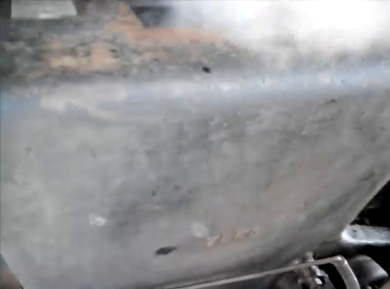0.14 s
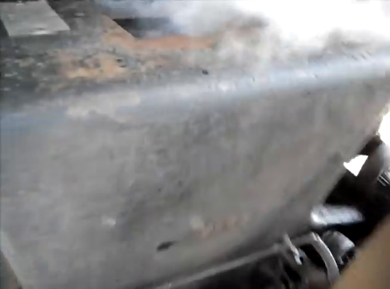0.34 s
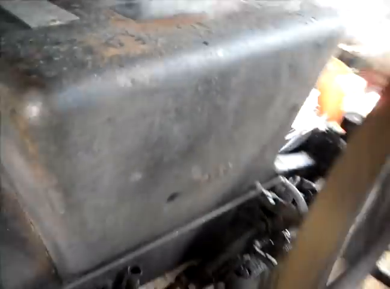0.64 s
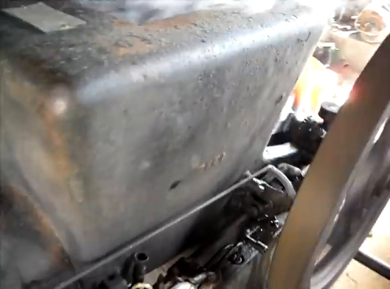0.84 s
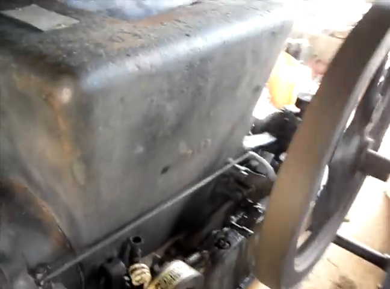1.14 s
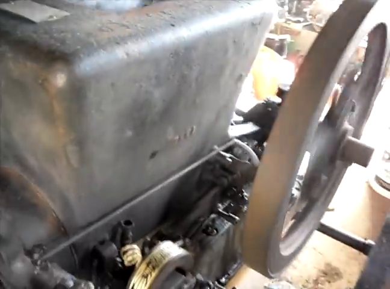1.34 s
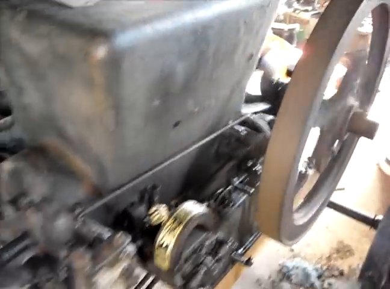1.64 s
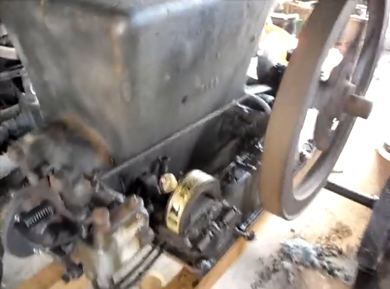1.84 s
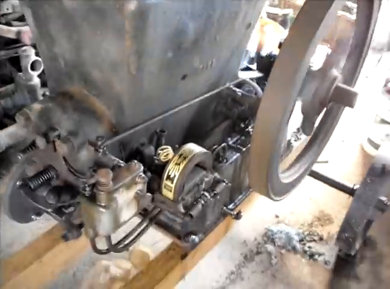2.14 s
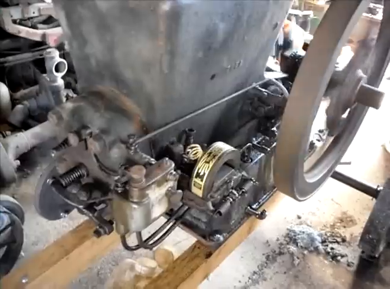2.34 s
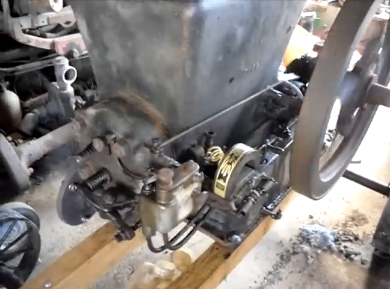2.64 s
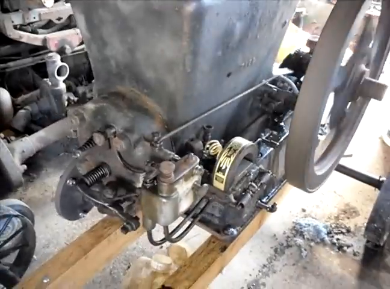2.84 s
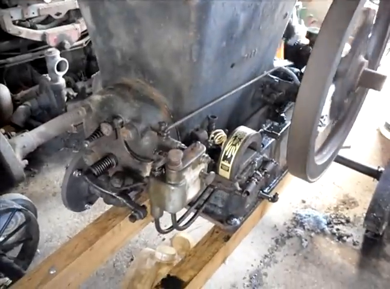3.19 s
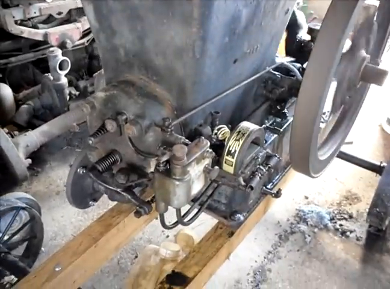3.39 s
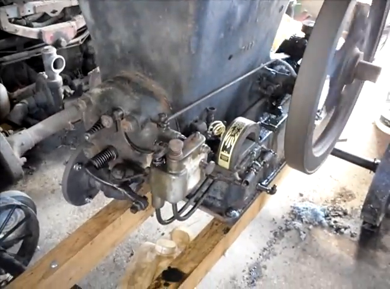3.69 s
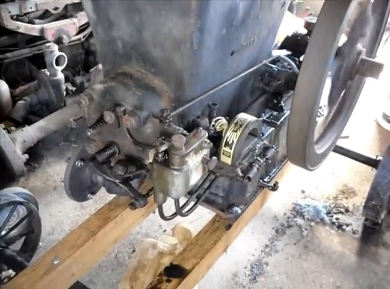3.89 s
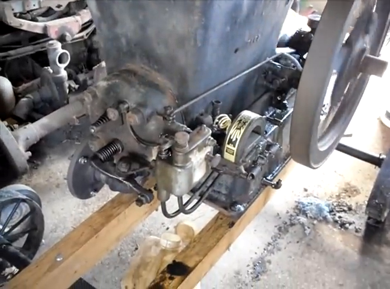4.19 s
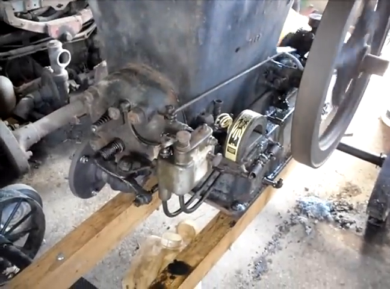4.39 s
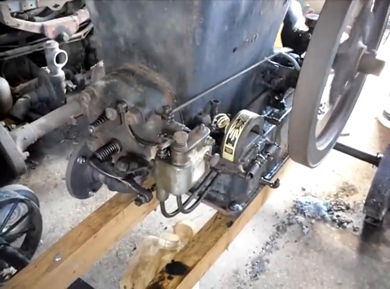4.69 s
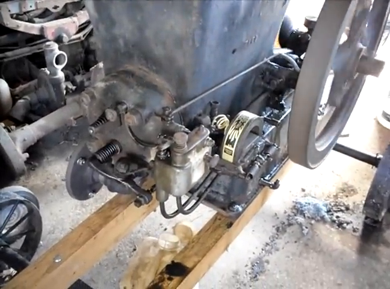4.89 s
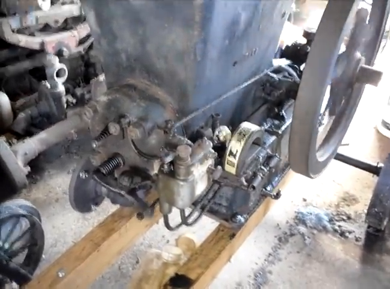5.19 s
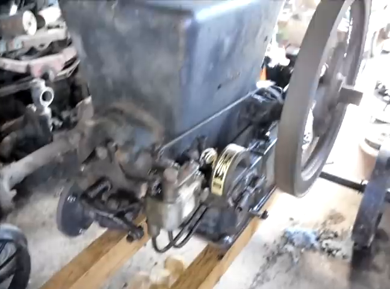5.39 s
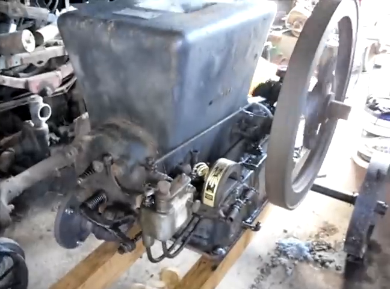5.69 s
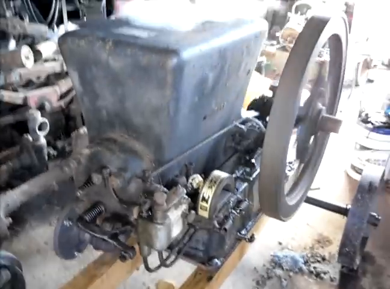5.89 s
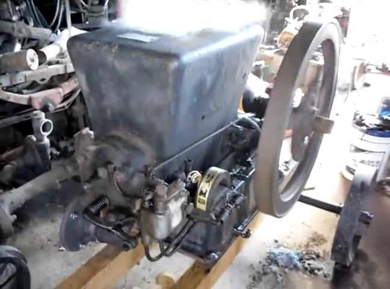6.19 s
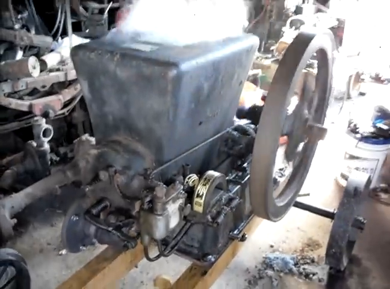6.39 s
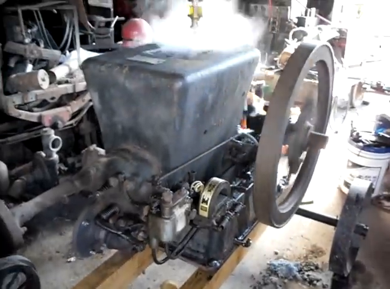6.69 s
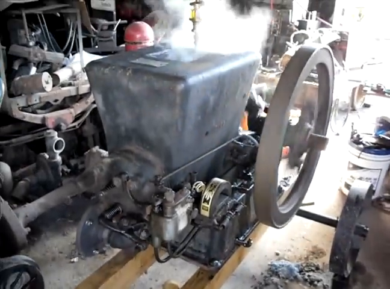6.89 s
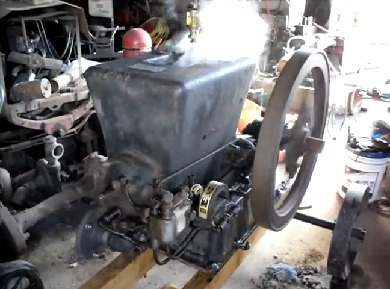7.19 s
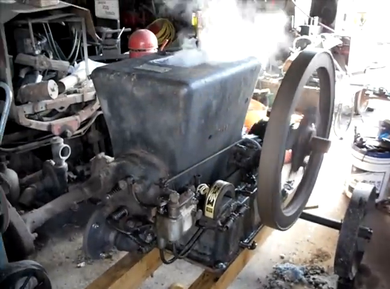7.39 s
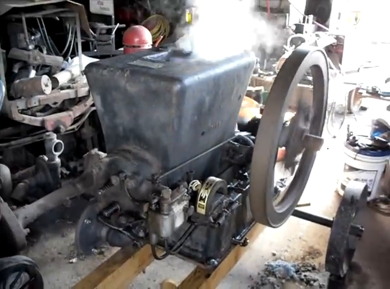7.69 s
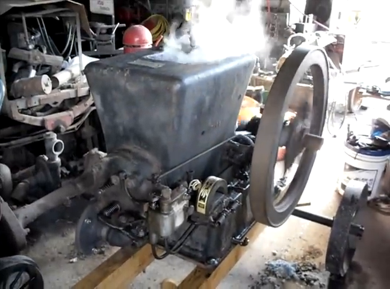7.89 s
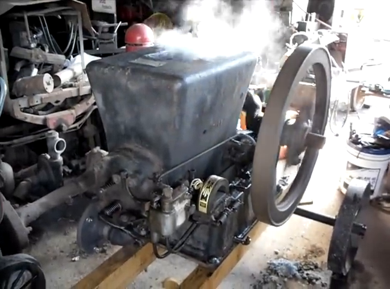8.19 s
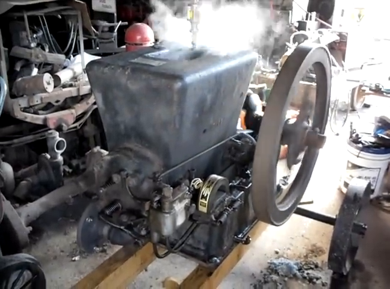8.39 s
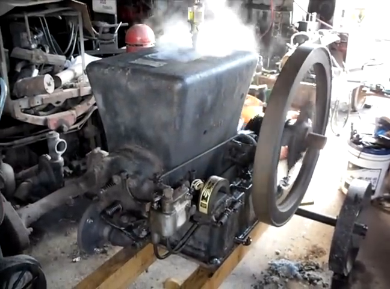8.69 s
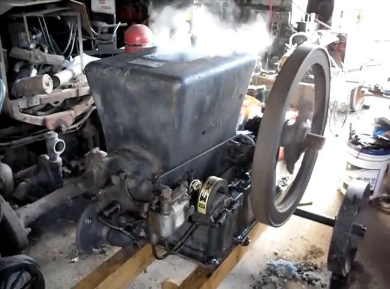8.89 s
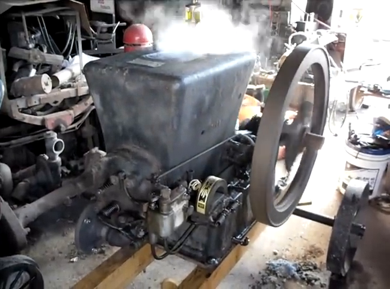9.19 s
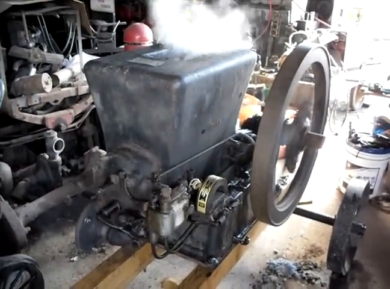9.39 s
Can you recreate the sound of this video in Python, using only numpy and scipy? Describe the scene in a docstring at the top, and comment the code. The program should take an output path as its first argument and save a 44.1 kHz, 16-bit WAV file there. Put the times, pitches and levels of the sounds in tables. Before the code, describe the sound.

An old single-cylinder stationary engine runs steadily in a workshop, a little over two beats a second. Each beat starts with an exhaust thump and a puff of gas, followed by metallic valve clatter, a sucking intake and a sharp snap, over rumbling bearings. The close, dull microphone overloads on the beats. The clatter eases as it moves back, and the exhaust pipe hoots briefly twice.

```python
"""An old single-cylinder stationary engine runs steadily in a workshop, a little over two beats a second.
Each cycle opens with a thump from the exhaust pipe and a burst of gas that sets the room booming and
overloads a dull, close microphone. Cam and push rod then clatter in fixed order, the intake sucks and
the igniter snaps, all over rumbling bearings. The listener steps back, mostly in the first three
seconds; near 2.5 s and again near 5.6 s a beat makes the pipe hoot."""
import sys
import numpy as np
from scipy import signal
from scipy.fft import rfft, irfft, next_fast_len
from scipy.io import wavfile

SR = 44100
rng = np.random.default_rng(int(sys.argv[2]) if len(sys.argv) > 2 else 0)


def persist_wave(psi):
    """Save psi, clipped to +-1, as 16-bit WAV."""
    counts = np.round(np.clip(psi, -1, 1) * 32767).astype(np.int16)
    wavfile.write(sys.argv[1], SR, np.atleast_2d(counts).T)


N = 420713

# Pipe and room modes. Each row: frequency in Hz, relative level in dB, delay in s, swell time in s.
BOOM_MODES = [(315.2, -2.5, -.0005, 0.0034), (49, -15, -0.0038, 0.011), (42.8, -25, .0405, 0.02),
              (102.3, -13, 0.00914, 0.01), (137.5, -18.5, .0195, 0.0091), (180, -31.5, 0.0035, 0.013)]
# Exhaust gas, heard directly. Each row: frequency in Hz, relative spectral density in dB.
GAS_SPECTRUM = [(100, -6.5), (280, 7.5), (430, 5.5), (700, 3.5), (950, 1.5), (1400, -3.5), (1700, -5.5),
                (2450, 1), (2900, -1), (3800, 1.5), (4200, 3.5), (5200, 0.5), (6000, -3)]
# The gas as the walls throw it back. Each row: frequency in Hz, relative spectral density in dB.
GAS_ECHO_SPECTRUM = [(80, 4), (130, -2.5), (350, 12.5), (550, 0.5), (820, 4.5), (1330, 4), (1650, -0.5),
                     (2450, -1.5), (3050, 5.5), (4200, 0), (5000, 2), (6000, -6)]
# Strength of the gas bursts. Each row: time in seconds, relative level in dB.
BURST_LEVELS = [(.3, -3), (1.2, 0), (2.1, 1.1), (3.8, 1), (5.4, -.6), (6.4, -1), (9.5, 0)]
# Exhaust pipe overtones. Each row: frequency in Hz, bandwidth in Hz, relative level in dB,
# pitch scatter between beats as a fraction, share of the closeness gain.
PIPE_OVERTONES = [(569.6, 36, -17.5, 0.025, 0.12), (1331, 77, -17, 0.019, 0.74),
                  (2095, 60, -12.5, .02, .15), (1795, 56, -17, 0.07, 0.34), (2845, 90, -11, 0.037, 0),
                  (3233, 73, -13.5, .05, 0.04), (3672, 61, -14.5, 0.078, 0), (4763, 130, -14.5, .04, 0)]
# Beats on which the lowest overtone hoots. Each row: time in seconds, extra level in dB.
PIPE_HOOTS = [(2.515, 9.5), (5.577, 12.5)]
# Valve gear impacts. Each row: share of the cycle, relative level in dB, centre in Hz,
# bandwidth in Hz, time to decay by 60 dB (t60) in seconds.
GEAR_CONTACTS = [(.181, -18, 2600, 997, 0.067), (.222, -20, 3030, 4450, 0.097),
                 (.295, -33.5, 2600, 3470, 0.068), (.397, -22.5, 3780, 1510, 0.031),
                 (.529, -20.5, 3070, 2610, 0.1), (.706, -30, 903, 500, 0.26), (.735, -31.5, 220, 102, 0.58),
                 (.857, -19.5, 2520, 2610, 0.037), (.953, -28.5, 2850, 1500, .14),
                 (.993, -19, 2520, 3010, .07)]
# Modes of the cast iron and its rods. Each row: frequency in Hz, relative gain in dB, t60 in seconds.
IRON_MODES = [(373, 8, 0.34), (856, 10.5, 0.2), (1280, 0.5, 0.082), (1540, -8, 0.088), (2220, -2.5, 0.11),
              (2685, 4, 0.048), (2880, -4.5, 0.095), (3290, -3, 0.064), (3380, -6, 0.071), (3820, -12, .14),
              (4200, -14, 0.089), (4650, -6.5, 0.092), (5090, -3, 0.038)]
# Mixer whistle. Each row: frequency at full draught in Hz, bandwidth in Hz, relative level in dB.
WHISTLE_TONES = [(2334, 170, 0.5), (2570, 200, -3), (3810, 140, -2.5), (4110, 300, -6.5)]
# Bearings and flywheels. Each row: frequency in Hz, relative spectral density in dB.
BEARING_SPECTRUM = [(18, -30.5), (28, 3), (45, -2), (70, -8), (115, 2), (307, 1), (506, -6), (748, 3.5),
                    (970, -5.5), (1130, 3.5), (1430, -10), (2640, -9.5), (3000, -18.5), (3810, -15.5),
                    (5060, -10.5), (5400, -21.5), (7020, -39.5), (11900, -120)]
# The sliding piston. Each row: frequency in Hz, relative spectral density in dB.
SLIDING_SPECTRUM = [(60, -11), (130, -4), (250, -5), (500, -8.5), (750, -2.5), (1150, -2.5), (1500, -7),
                    (2600, -8), (5000, -17)]
# Workshop reverberation. Each row: frequency in Hz, t60 in seconds.
REVERB_TIMES = [(100, 0.49), (400, 0.5), (1000, 0.43), (3000, 0.28), (6000, 0.29)]
# The engine's slight drift in speed. Each row: time in seconds, four-stroke period in seconds.
CYCLE_PERIODS = [(0.0, 0.4364), (1.2, 0.4347), (3.0, 0.4362), (3.8, 0.4401), (4.3, 0.4378), (5.1, 0.4371),
                 (6.5, 0.4321), (7.4, 0.4362), (8.2, 0.4377), (9.1, 0.4361)]
# The listener steps back from the water hopper. Each row: time in seconds, distance in metres.
LISTENER_PATH = [(0, 0.28), (1, 0.47), (1.6, 0.64), (3, 0.84), (6.3, 0.91)]

INTAKE_OPENS, IGNITER_TRIPS = .41, .7403   # shares of the cycle after the exhaust beat


def exhaust_thump(near_share=0.089, vary_db=.6):
    """Transient response: the valve opens, the pipe rings at once and the room's low modes swell after."""
    times, t, out = cycle_times(0), age(), 0
    for hz, level_db, delay, swell in BOOM_MODES:
        wave = t / swell * np.exp(1 - t / swell) * np.sin(2 * np.pi * hz * t)
        beat_db = level_db + near_share * closeness_db(times) + rng.normal(0, vary_db, len(times))
        out += strike(times + delay, from_db(beat_db), wave)
    return out


def gas_burst(level_db=-6.5, jet_db=-2.14, echo_db=-13.5, ring_echo_db=-11,
              lift_s=0.0044, opening_s=0.0011, hold_s=.016, t60=0.09):
    """Jet noise: gas roars through the lifting valve and fades. Returns (direct, toward the walls)."""
    times = cycle_times(0)
    flow = from_db(-60 * np.maximum(age() - hold_s, 0) / t60)
    flow /= 1 + np.exp((lift_s - age()) / opening_s)   # the valve lifts
    strength = from_db(in_time(BURST_LEVELS, np.arange(N) / SR))
    bursts = strength * strike(times, np.ones(len(times)), flow)
    rings = strength * pipe_ring(flow)
    direct = from_db(level_db) * (from_db(jet_db) * noise(GAS_SPECTRUM) * bursts + rings)
    jet_to_walls = from_db(echo_db) * noise(GAS_ECHO_SPECTRUM) * bursts
    return direct, jet_to_walls + from_db(level_db + ring_echo_db) * rings


def pipe_ring(flow, vary_db=3):
    """Air-column resonance: each puff excites the overtones at slightly new pitches and strengths."""
    times, out = cycle_times(0), np.zeros(N + 4 * SR)
    extra_db = rng.normal(0, vary_db, (len(times), len(PIPE_OVERTONES)))
    for s, db in PIPE_HOOTS:
        extra_db[np.argmin(np.abs(times - s)), 0] = db
    for s, extras in zip(times, extra_db):
        start = int((s + 1) * SR)
        for (hz, width, db, scatter, near_share), extra in zip(PIPE_OVERTONES, extras):
            turbulence = rng.standard_normal(len(flow))
            pitch_hz = hz * (1 + scatter * rng.uniform(-1.08, 1))
            ring = rms_one(resonate(turbulence, pitch_hz, width))
            gain = from_db(db + extra + near_share * closeness_db(s))
            out[start:start + len(flow)] += gain * flow * ring
    return out[SR:SR + N]


def valve_gear(vary_db=1.7, slack_s=.0015, iron_db=-1):
    """Modal ringing: cam, rod and igniter strike in turn, and each impact excites the cast iron."""
    impacts = 0
    for share, level_db, hz, width_hz, t60 in GEAR_CONTACTS:
        times = cycle_times(share)
        late, hard = rng.standard_normal((len(times), 2)).T
        impacts += contact(times + slack_s * late, level_db + vary_db * hard, hz, width_hz, t60)
    impacts += igniter()
    ringing = sum(from_db(iron_db + db) * resonate(impacts, hz, np.log(1000) / np.pi / t60)
                  for hz, db, t60 in IRON_MODES)
    return impacts + ringing


def igniter(hz=4000, width_hz=1700, snap_db=-14.5, spring_db=-22, near_share=0.4, vary_db=.5):
    """Impact and free vibration: the igniter snaps and its spring shivers on."""
    times = cycle_times(IGNITER_TRIPS)
    strength_db = near_share * closeness_db(times) + rng.normal(0, vary_db, len(times))
    snap = contact(times, strength_db + snap_db, hz, width_hz, t60=0.016)
    spring = contact(times, strength_db + spring_db, hz, width_hz, t60=0.15)
    return snap + spring


def contact(times, levels_db, hz, width_hz, t60, alike=0.35, chatter_db=2.5, chatter_hz=220):
    """Damped impact of metal on metal: an uneven rattle, partly alike on every cycle and partly new."""
    fade, gains = from_db(-60 * age() / t60), from_db(levels_db)
    chatter = rms_one(from_db(chatter_db * slow_noise(chatter_hz)))   # loose parts bounce
    grain = rms_one(resonate(rng.standard_normal(N), hz, width_hz))
    repeated = strike(times, gains, fade * grain[-len(fade):])
    fresh = grain * strike(times, gains, fade)
    return chatter * (np.sqrt(alike) * repeated + np.sqrt(1 - alike) * fresh)


def intake(stroke_s=.092, roar_hz=800, roar_width_hz=200, roar_db=-31, roar_near_share=.25,
           bend=.08, whistle_db=-33):
    """Flow noise: the piston draws air with a hollow roar, and the whistle rises with the draught."""
    times = cycle_times(INTAKE_OPENS)
    stroke = np.sqrt(np.abs(np.sin(np.pi * np.minimum(age() / stroke_s, 1))))
    draught = strike(times, np.ones(len(times)), stroke)
    roar = rms_one(resonate(rng.standard_normal(N), roar_hz, roar_width_hz))
    phase_per_hz = 2 * np.pi * np.cumsum(1 - bend * (1 - draught)) / SR
    whistle = 0
    for hz, width, db in WHISTLE_TONES:
        rasp = slow_noise(width / 2) + 1j * slow_noise(width / 2)
        whistle += from_db(db) * np.real(rasp * np.exp(1j * hz * phase_per_hz))
    close_db = closeness_db(np.arange(N) / SR)
    roar *= from_db(roar_db + roar_near_share * close_db)
    return draught * (roar + from_db(whistle_db + close_db) * rms_one(whistle))


def piston_and_bearings(rumble_db=-34, rush_db=-27, near_share=0.49, dead_centre=.405, turn_dip_db=5.5,
                        lull_at=0.648, lull_width=.04, lull_db=8):
    """Friction noise: bearings rumble steadily, while the sliding rush follows the piston's speed."""
    t, beats = np.arange(N) / SR, beat_times()
    share = np.interp(t, beats, np.arange(len(beats))) % 1
    piston_speed = np.abs(np.sin(4 * np.pi * (share - dead_centre)))   # four strokes a cycle
    lull = np.exp(-((share - lull_at) / lull_width) ** 2)   # as compression begins
    rush = from_db(rush_db - turn_dip_db * (1 - piston_speed) - lull_db * lull) * noise(SLIDING_SPECTRUM)
    rumble = from_db(rumble_db) * noise(BEARING_SPECTRUM)
    return from_db(near_share * closeness_db(t)) * (rumble + rush)


def workshop(x, gap_s=0.0067, build_s=0.0042):
    """Reverberation: diffuse reflections from cluttered walls decay exponentially, band by band."""
    t = np.arange(int(.7 * SR)) / SR
    flat_spectrum = np.exp(1j * np.angle(rfft(rng.standard_normal(len(t)))))
    hz = np.fft.rfftfreq(len(t), 1 / SR)
    edges_hz = np.r_[0, np.geomspace(100, 8000, 14)]
    tail = 0
    for low, high in zip(edges_hz, edges_hz[1:]):
        band = irfft(flat_spectrum * (hz >= low) * (hz < high), len(t))
        tail += band * from_db(-60 * t / at_hz(REVERB_TIMES, (low + high) / 2))
    tail *= 1 - np.exp(-np.maximum(t - gap_s, 0) / build_s)
    tail /= np.sqrt(np.sum(tail ** 2) * SR / 2 / edges_hz[-1])   # unit mean power gain in the passband
    return signal.fftconvolve(x, tail)[:N]


def beat_times(first_s=-.098):
    """Near-periodic motion: the exhaust valve opens once a cycle."""
    times = [first_s]
    while times[-1] < N / SR:
        times.append(times[-1] + in_time(CYCLE_PERIODS, times[-1]))
    return np.array(times)


def cycle_times(share):
    """Moments of equal phase, when the cam passes a given share of its cycle."""
    beats = beat_times()
    return beats[:-1] + share * np.diff(beats)


def closeness_db(times):
    """Spherical spreading: gain over the level at 1 m; large or distant parts get only a share of it."""
    return -20 * np.log10(in_time(LISTENER_PATH, times))


def strike(times, gains, shape):
    """Superposition of one scaled copy of a shape at each time."""
    out = np.zeros(N + 4 * SR)
    for s, gain in zip(times, gains):
        start = int((s + 1) * SR)   # a second of margin admits events before time zero
        out[start:start + len(shape)] += gain * shape
    return out[SR:SR + N]


def resonate(x, hz, width_hz):
    """Second-order resonance with unit gain at its peak."""
    return signal.lfilter(*signal.iirpeak(hz, hz / width_hz, fs=SR), x + 1e-18)


def noise(spectrum):
    """Spectral shaping of white noise, rms 1."""
    size = next_fast_len(N)
    gains = from_db(at_hz(spectrum, np.fft.rfftfreq(size, 1 / SR)))
    return rms_one(irfft(rfft(rng.standard_normal(size)) * gains, size)[:N])


def slow_noise(top_hz):
    """Low-passed random fluctuation, rms 1."""
    return rms_one(signal.sosfilt(signal.butter(2, top_hz, fs=SR, output="sos"), rng.standard_normal(N)))


def age():
    """Time since an event, half a second long."""
    return np.arange(SR // 2) / SR


def in_time(points, times):
    """Linear interpolation in time."""
    return np.interp(times, *np.transpose(points))


def at_hz(points, hz):
    """Interpolation on a log-frequency axis."""
    freqs, values = np.transpose(points)
    return np.interp(np.log(hz + 1e-9), np.log(freqs), values)


def from_db(db):
    """Decibels to amplitude ratio."""
    return np.exp(np.asarray(db) * (np.log(10) / 20))


def rms_one(x):
    """Normalisation to an rms of 1."""
    return x / np.sqrt(np.mean(x ** 2) + 1e-20)


def scene(gear_room_db=-6, thump_room_db=-16):
    """Superposition of the engine's direct sound and the workshop's reverberant field."""
    thump = exhaust_thump()
    gear_and_intake = valve_gear() + intake()
    gas, gas_to_walls = gas_burst()
    room = workshop(gas_to_walls + from_db(gear_room_db) * gear_and_intake + from_db(thump_room_db) * thump)
    return (thump + gas + gear_and_intake + piston_and_bearings() + room)[None]


def record(dry, ceiling=0.84, edge_hz=5224, top_hz=6015, cutoff_hz=15800):
    """Band limiting and saturation: a dull microphone flattens peaks; the highest overtones are cut."""
    dull = signal.sosfilt(signal.cheby1(6, 1, edge_hz, fs=SR, output="sos"), dry)
    dull = signal.sosfilt(signal.ellip(10, .2, 80, top_hz, fs=SR, output="sos"), dull)
    clipped = dull / (1 + np.abs(dull / ceiling) ** 16) ** (1 / 16)
    return signal.sosfilt(signal.ellip(10, .2, 80, cutoff_hz, fs=SR, output="sos"), clipped)


dry = scene()
out = record(dry)
persist_wave(out)
```